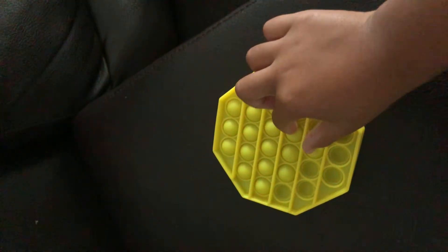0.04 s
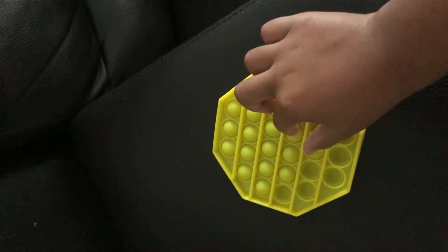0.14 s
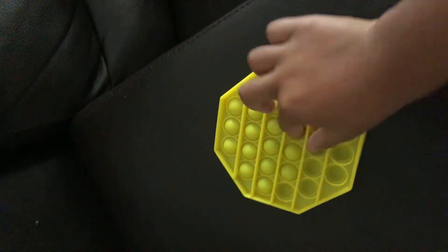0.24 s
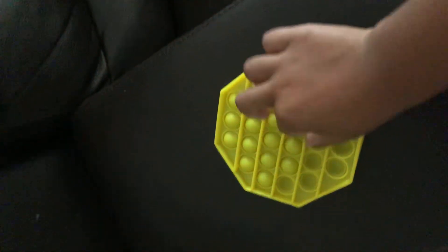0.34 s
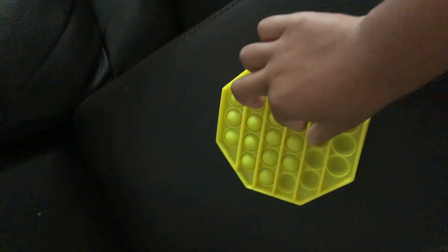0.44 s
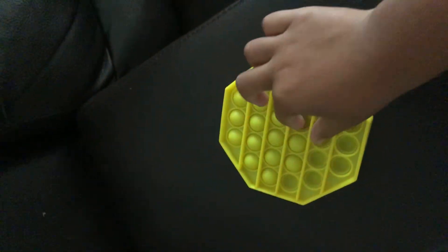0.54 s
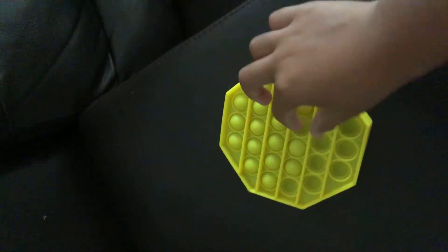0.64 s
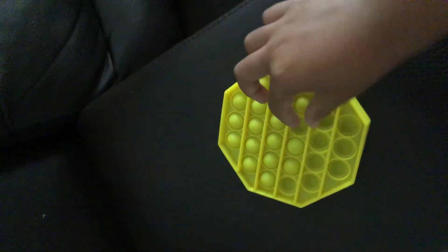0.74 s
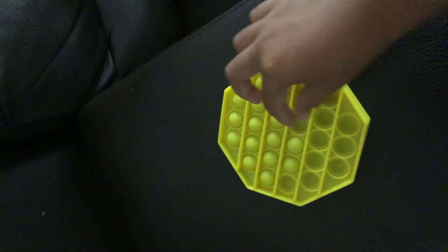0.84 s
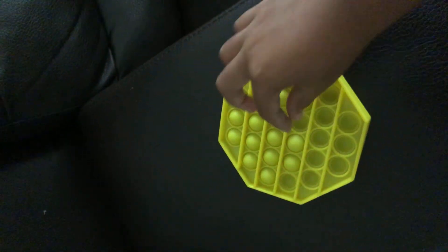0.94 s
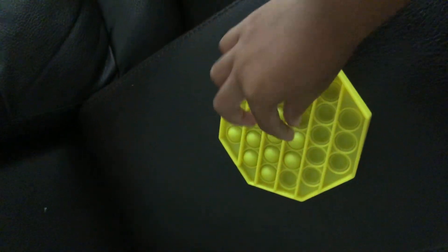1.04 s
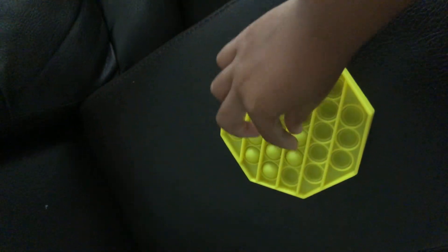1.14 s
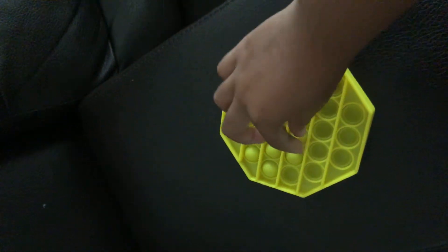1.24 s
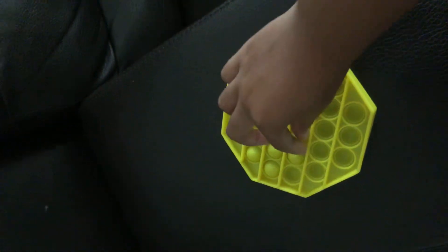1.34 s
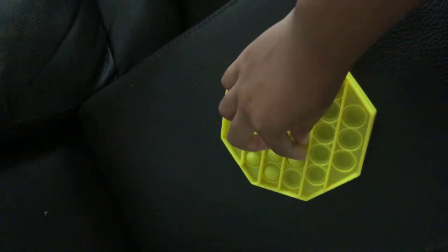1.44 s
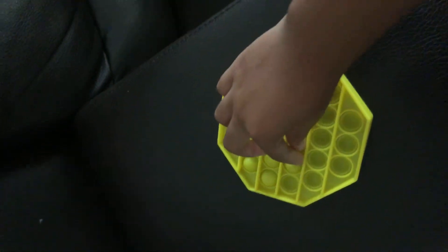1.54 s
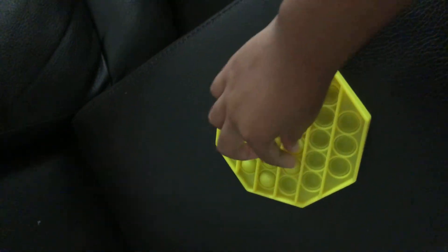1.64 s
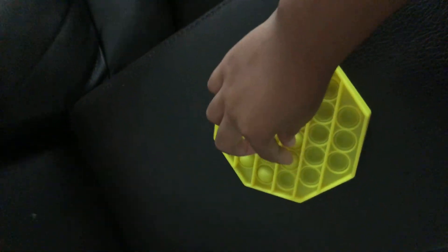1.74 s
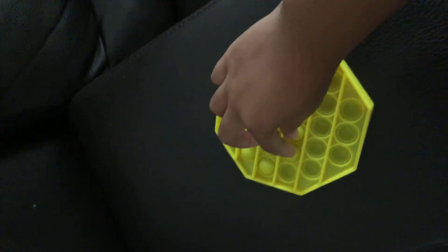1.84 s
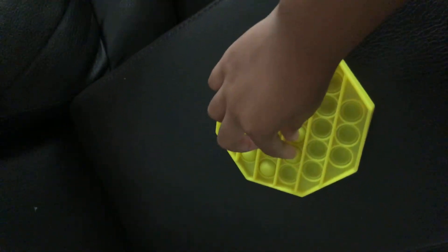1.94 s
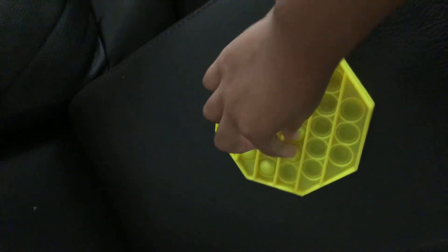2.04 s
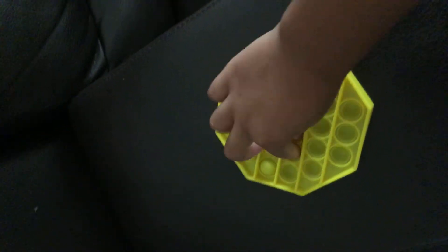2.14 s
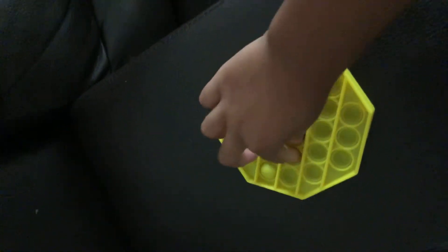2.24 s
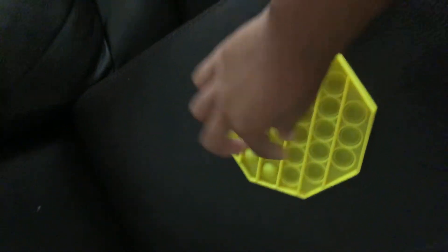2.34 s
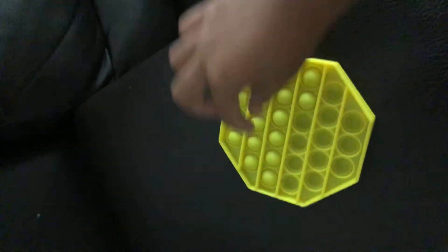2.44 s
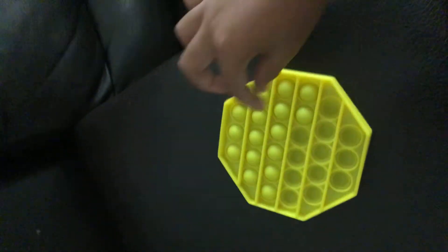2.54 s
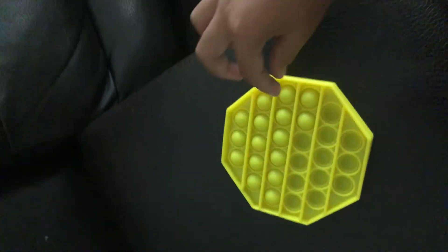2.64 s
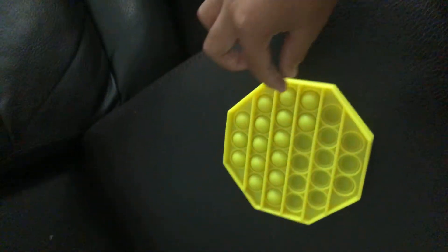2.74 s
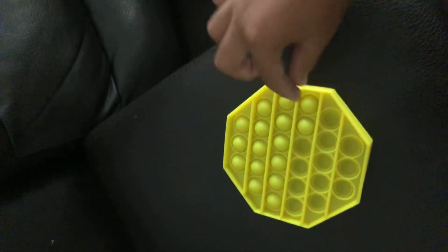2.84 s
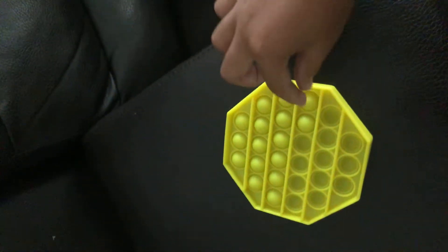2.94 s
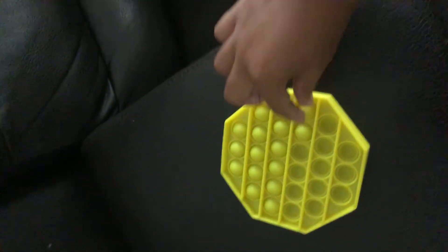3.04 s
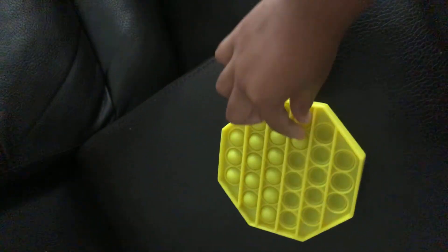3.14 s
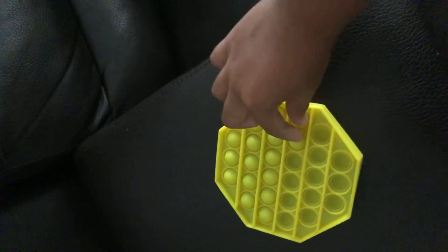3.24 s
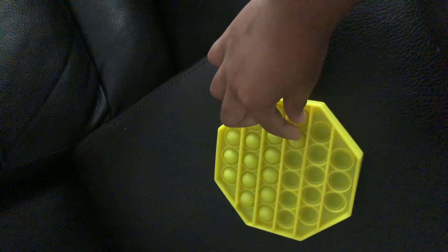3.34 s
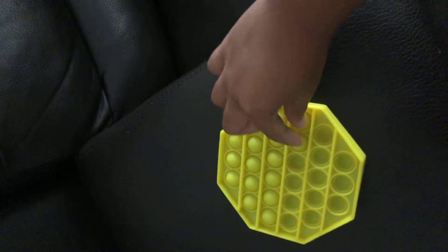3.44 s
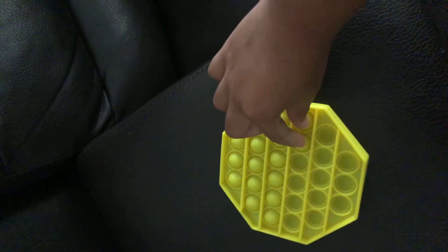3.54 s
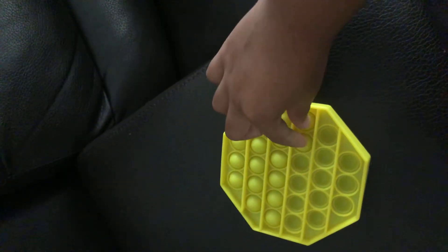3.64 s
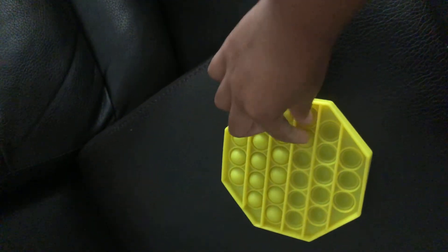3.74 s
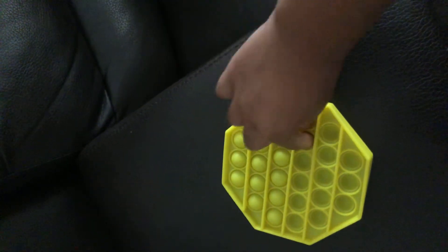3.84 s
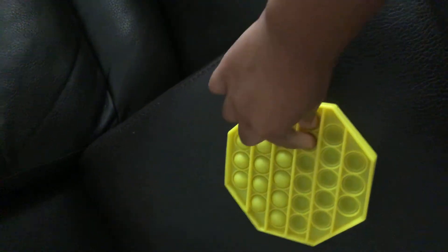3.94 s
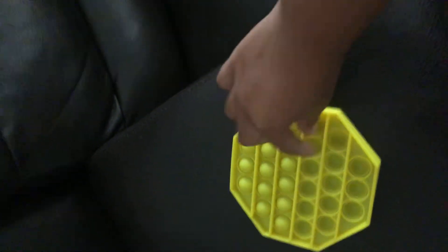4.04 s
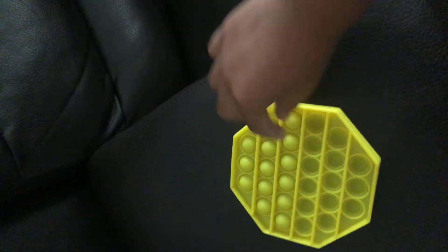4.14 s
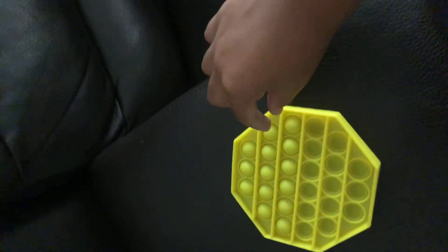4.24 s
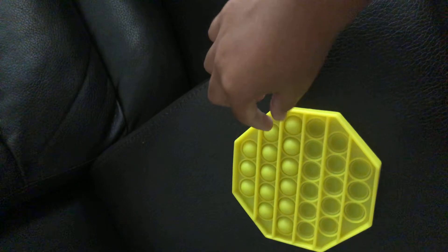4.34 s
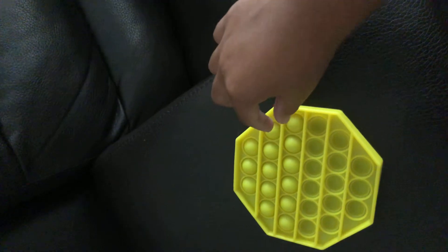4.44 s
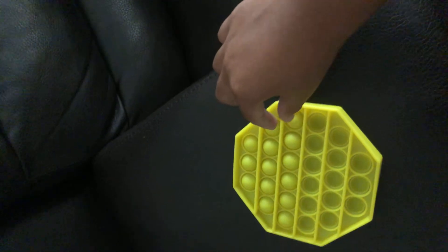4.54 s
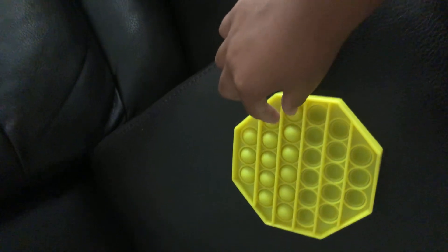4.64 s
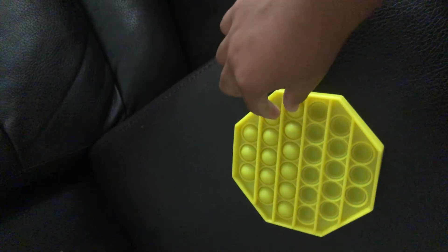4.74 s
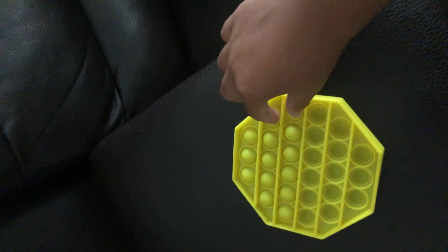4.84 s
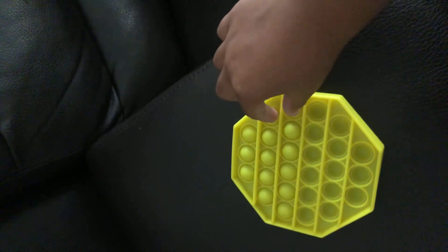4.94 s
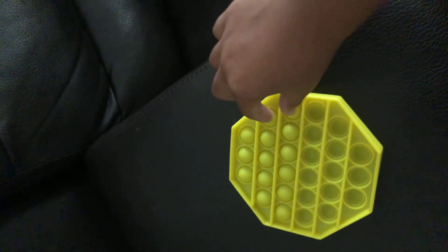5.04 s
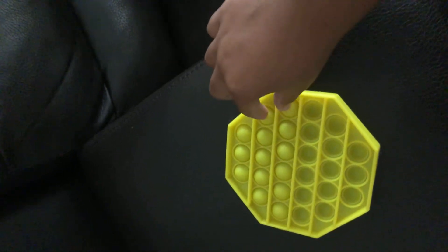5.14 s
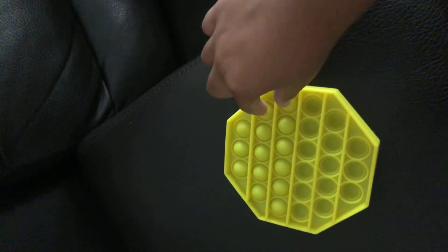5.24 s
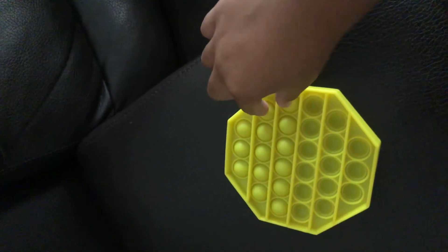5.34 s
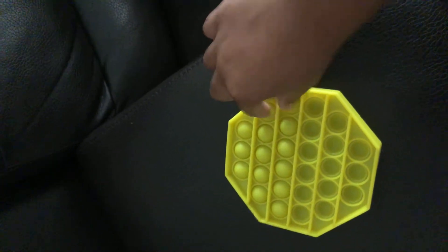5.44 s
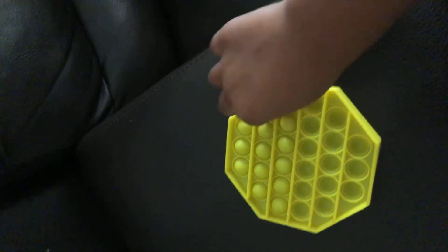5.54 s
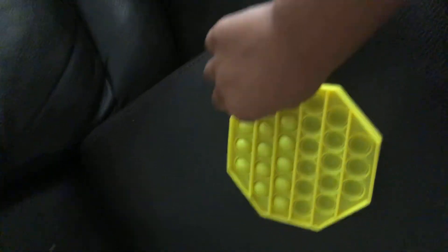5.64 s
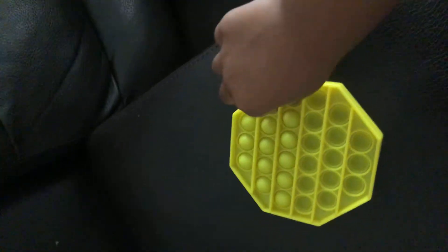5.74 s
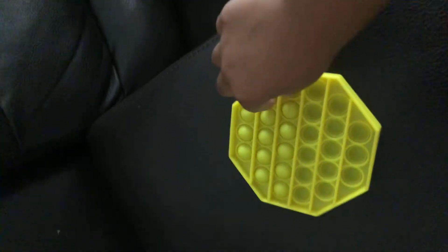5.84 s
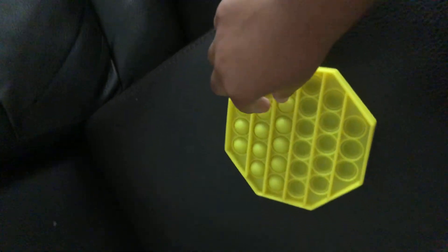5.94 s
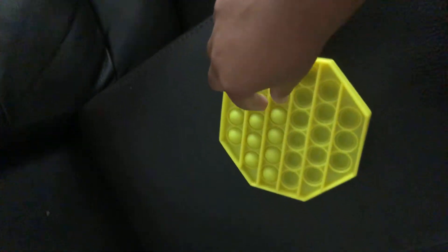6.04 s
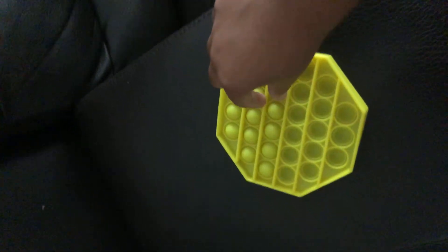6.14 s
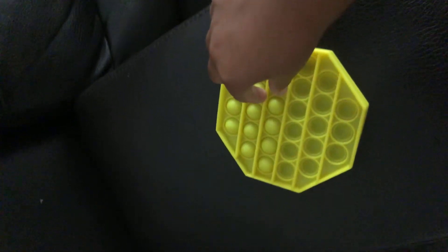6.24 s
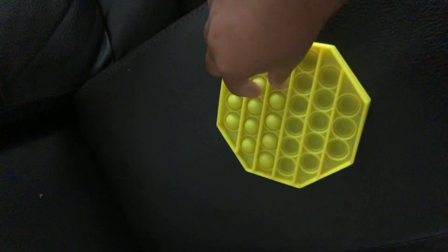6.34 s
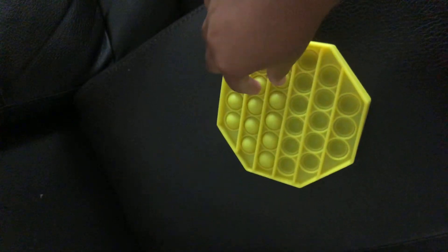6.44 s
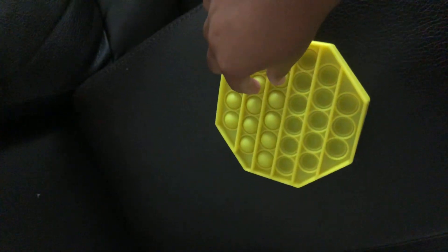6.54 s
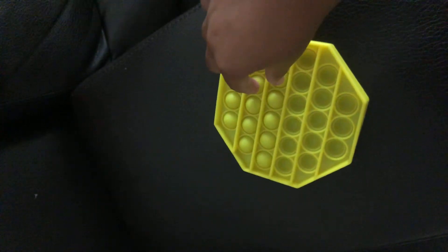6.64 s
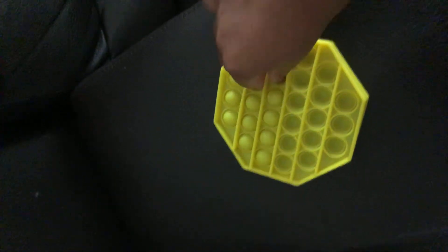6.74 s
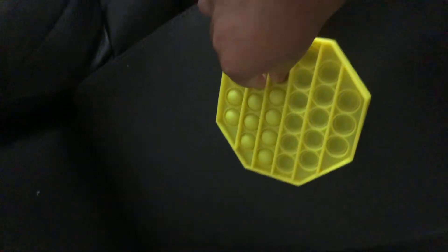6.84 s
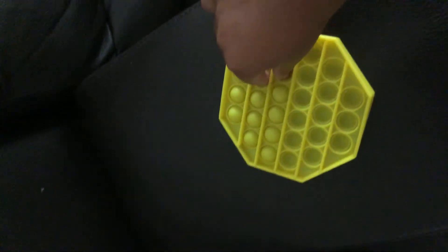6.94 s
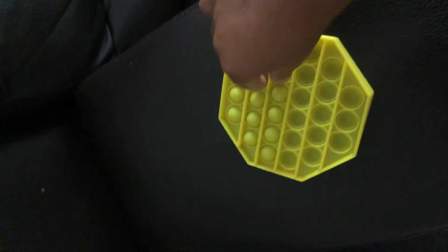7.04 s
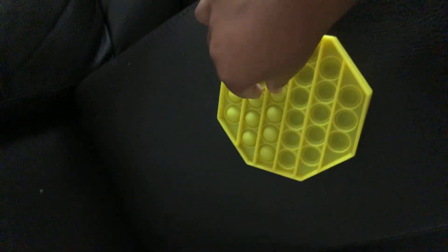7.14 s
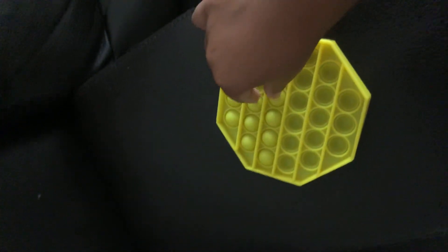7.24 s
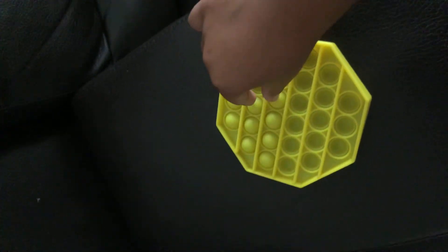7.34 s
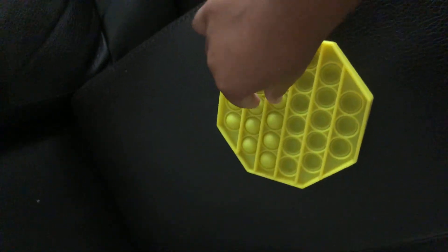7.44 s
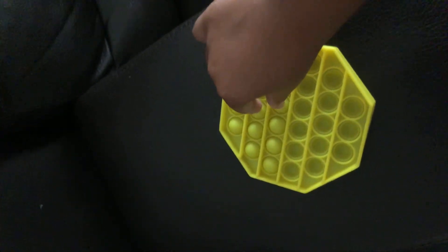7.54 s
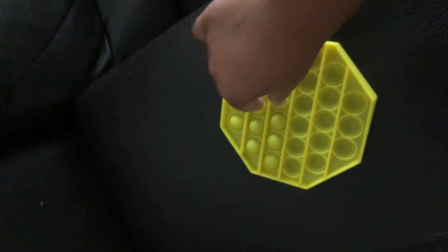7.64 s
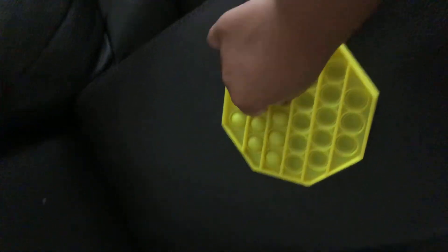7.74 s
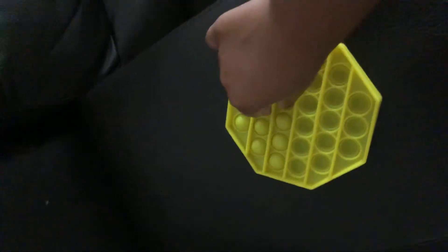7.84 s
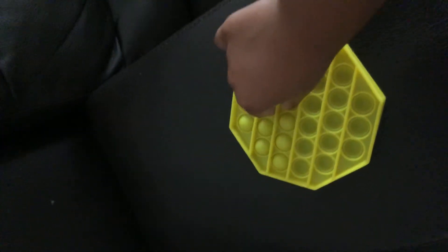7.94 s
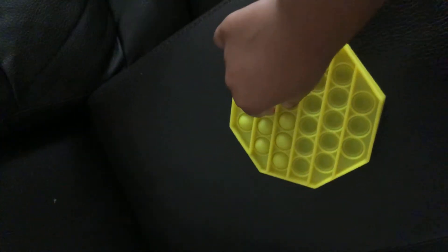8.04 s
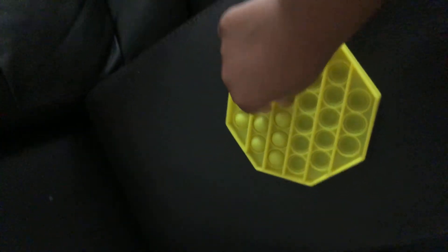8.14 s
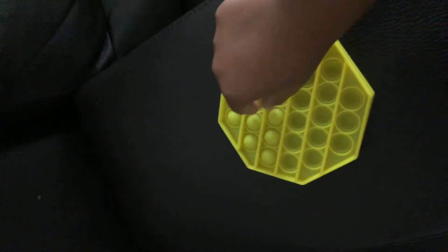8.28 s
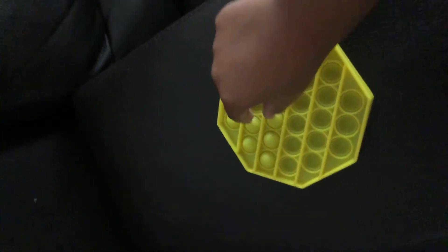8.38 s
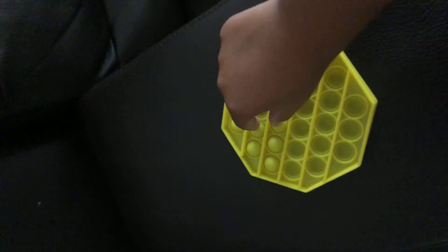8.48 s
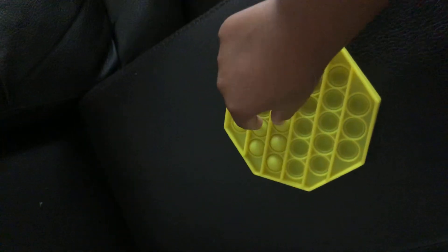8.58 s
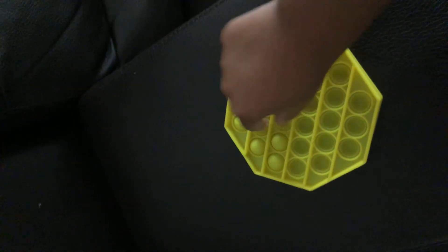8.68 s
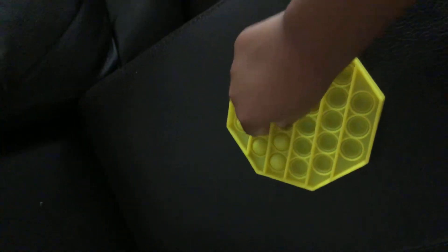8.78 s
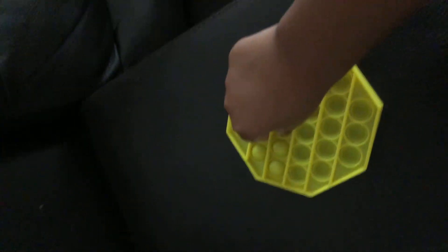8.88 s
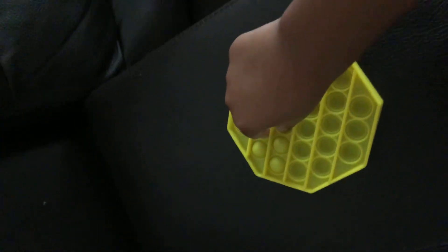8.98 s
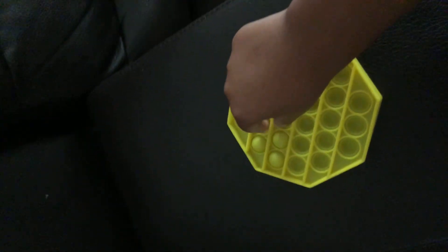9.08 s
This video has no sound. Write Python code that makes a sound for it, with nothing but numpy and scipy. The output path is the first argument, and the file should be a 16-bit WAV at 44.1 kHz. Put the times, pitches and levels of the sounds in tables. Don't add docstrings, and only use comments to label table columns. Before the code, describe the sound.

Seven sharp, hollow silicone pops, spaced one to two seconds apart, in a quiet living room over faint low hum and soft hiss.

```python
import sys
import numpy as np
from scipy import signal
from scipy.fft import rfft, irfft, next_fast_len
from scipy.io import wavfile
from scipy.ndimage import uniform_filter1d

SR = 44100
rng = np.random.default_rng(int(sys.argv[2]) if len(sys.argv) > 2 else 0)


def nominal_scale(level):
    x = np.asarray(level, float) / 20
    return 10 ** x


def wav_record(signal):
    frames = np.transpose(np.atleast_2d(signal))
    bounded = np.clip(frames, -1, 1)
    quanta = np.round(bounded * 32767).astype(np.int16)
    wavfile.write(sys.argv[1], SR, quanta)


N = 401751
LENGTH = next_fast_len(N, real=True)
RISE_S, GRIP = 0.0018, 1.9


def shaped(gain):
    noise = irfft(rfft(rng.standard_normal(LENGTH)) * gain, LENGTH)
    return noise / noise.std()


def colour(points, hz):
    f, db = np.transpose(points)
    return nominal_scale(np.interp(np.log(hz + 1), np.log(f), db))


def bell(hz, centre_hz, width_hz):
    return 1 / (1 + ((hz - centre_hz) / (width_hz / 2)) ** 2)


def ring(hz, db, t60, rise, phase=0., grip=1.):
    t = np.arange(int(1.2 * t60 * SR)) / SR
    build_up = 1 - np.exp(-(t / rise) ** 2)
    decay = np.exp(-np.log(1000) * (t / t60) ** grip)
    shape = build_up * decay
    return nominal_scale(db) * shape / shape.max() * np.sin(2 * np.pi * hz * t + phase)


def add(out, s, x):
    i = max(int(s * SR), 0)
    out[i:i + len(x)] += x[:len(out) - i]


def detune(spread):
    return 1 + spread * rng.standard_normal()


# start in seconds, low boom in dB, seat thud in dB, rim ring in dB,
# air puff in dB.
POPS = [
    (0.177, -49, -35, -53, -29.5),
    (2.018, -42, -33.5, -38.5, -29),
    (3.71, -45, -33.5, -23, -29.5),
    (5.408, -44, -45, -28, -30),
    (6.633, -38, -28, -31, -27.5),
    (7.619, -50.5, -73, -35, -30.5),
    (8.635, -49, -53, -40.5, -30.5),
]
# centre in seconds, spread in seconds, mid hiss in dB,
# treble hiss in dB.
ARM_SHIFTS = [
    (.45, 0.12, -2.5, 2),
    (1.05, 0.24, 3.5, 1.2),
    (2.62, 0.15, .7, 2.5),
    (3.6, .15, 0.6, 3),
    (3.921, .1, 5.5, -1.5),
    (4.48, 0.21, 3.5, 2.5),
    (5.35, .2, 0.2, 2.5),
    (6.15, 0.21, -0.3, 1),
    (7.5, .3, 4.5, 0.5),
    (8.0, 0.093, 3, 2.5),
]


def suppressor(t):
    duck = 0
    for s, *_ in POPS:
        late = t - s - 0.3
        duck = duck + np.exp(-(late / np.where(late > 0, 0.2, 0.08)) ** 2)
    mid_db, treble_db = 0, 0
    for s, spread_s, shift_mid_db, shift_treble_db in ARM_SHIFTS:
        opening = np.exp(-((t - s) / spread_s) ** 2)
        mid_db = mid_db + shift_mid_db * opening
        treble_db = treble_db + shift_treble_db * opening
    top_db = 0.48 * treble_db
    return mid_db - 1.5 * duck, treble_db - 2.5 * duck, top_db


# frequency in Hz, density in dB per Hz.
HISS_COLOUR = [(25, -34), (40, -10), (60, -12), (90, -13), (170, -11), (250, -13.5), (530, -17),
               (1200, -25.5), (2000, -30.5), (4000, -32), (5700, -32), (7800, -35), (8400, -37),
               (16000, -41)]


def room_hiss(t, hz):
    mid_db, treble_db, top_db = suppressor(t)
    gain = colour(HISS_COLOUR, hz)
    share = np.sum(gain[(hz > 2000) & (hz < 7000)] ** 2) / np.sum(gain ** 2)
    hiss = rfft(shaped(gain)) * nominal_scale(-78) / np.sqrt(share)
    crossover = 1 / (1 + (hz / 1600) ** 4)
    mid = crossover * (hz > 190)
    treble = (1 - mid) * (hz > 190) * (hz < 8000)
    top = (1 - mid) * (hz >= 8000)
    out = irfft(hiss * (hz <= 190), LENGTH)
    out += irfft(hiss * mid, LENGTH) * nominal_scale(mid_db + 0.33)
    out += irfft(hiss * treble, LENGTH) * nominal_scale(treble_db + 0.42)
    out += irfft(hiss * top, LENGTH) * nominal_scale(top_db - 0.3)
    return out


# pitch in Hz, steady part in dB, wavering part in dB, width of the waver in Hz.
HUM = [(60.5, -74.5, -79, 13), (119.6, -66, -72.5, 25), (169.4, -77.5, -78, 15)]


def mains_hum(hz):
    out = np.zeros(LENGTH)
    for f, steady_db, waver_db, width_hz in HUM:
        pitch = 1 + 0.02 * shaped(bell(hz, 0, 6))
        out += nominal_scale(steady_db) * np.sqrt(2) * np.sin(2 * np.pi * f * np.cumsum(pitch) / SR)
        out += nominal_scale(waver_db) * shaped(bell(hz, f, width_hz))
    return out


# flip in seconds, pitch in Hz, level in dB.
LEAD_TONES = [(.175, 2200, -37.5), (.173, 3200, -42.5), (2.0165, 2200, -41), (2.012, 3100, -47),
              (3.710, 3300, -42.5), (5.408, 3000, -39), (6.6325, 2100, -37), (7.6185, 2200, -40.5),
              (8.6345, 3100, -37)]


def lead_tones():
    out = np.zeros(LENGTH)
    for s, hz, db in LEAD_TONES:
        tone = ring(hz, db + 1.0, 0.018, 0.00051)[::-1]
        add(out, s + 0.0011 - len(tone) / SR, tone)
    return out


def lead_in(x):
    n = int(0.014 * SR)
    swell = rng.standard_normal(n) * np.linspace(0.3, 1, n) * nominal_scale(-23.5) / np.sqrt(n)
    return signal.fftconvolve(x, swell)[n - 1:]


# start in seconds, lowest mode in dB, lowest mode in Hz,
# second mode in relative dB, upper modes in relative dB.
SNAPS = [(0.175, -25.5, 722, 1, 4), (0.184, -24.5, 670, -5.5, -1.5), (2.016, -23.5, 585, 3.5, -2.5),
         (2.025, -34, 477, 0.5, -13.5), (2.032, -24, 753, -14.5, -16), (3.71, -23, 630, 2, 4.5),
         (3.719, -31.5, 510, -0.5, -5.5), (5.408, -17, 648, 0, -11), (5.419, -36.5, 590, 6, -5.5),
         (6.632, -22.5, 698, -1, -0.5), (6.638, -25, 630, 8, 0), (6.647, -40.5, 615, -12.5, 10.5),
         (7.618, -24.5, 576, 1.5, -1), (7.627, -37, 512, -8, -5), (7.631, -27.5, 670, -13, -8.5),
         (8.635, -17, 647, 0, -3), (8.644, -38.5, 583, -4, -9)]
# frequency in Hz, t60 in seconds.
SECOND = (1391, 0.0098)
# frequency in Hz, level in dB, t60 in seconds.
UPPER = [(2010, -3, .011), (2490, -9, 0.0084)]
# frequency in Hz, level in dB, t60 in seconds.
CRACK = [(3960, 2.5, 0.0051), (5230, -1, 0.0088), (5970, 0.5, 0.0047)]
# cap mode in Hz, cap mode in dB,
# bright mode in Hz, bright mode in dB, crack in dB.
UPWARDS = [(2970, -27.5, 4290, -37.5, -30.5), (2940, -26.5, 4300, -30, -25), (3000, -29, 4200, -42.5, -45),
           (2780, -29.5, 5900, -40.5, -32.5), (2710, -26, 5900, -41, -35.5),
           (2606, -27.5, 5680, -39.5, -38), (2686, -24, 4930, -40, -27.5)]
REBOUND_CRACKS = [-35, -42.5, -35.5, -43, -53, -32, -43.5, -41, -53, -33.5]
# frequency in Hz, level over the crack in dB, t60 in seconds.
TICK = (8400, -27, .003)


def snaps():
    out = np.zeros(LENGTH)
    rebound_cracks = iter(REBOUND_CRACKS)
    for s, db, hz, second_db, upper_db in SNAPS:
        since = s - np.array(POPS)[:, 0]
        pop = np.argmin(abs(since))
        is_rebound = since[pop] >= 0.004
        crack_db = next(rebound_cracks) if is_rebound else UPWARDS[pop][4]
        if is_rebound:
            cap_hz = UPWARDS[pop][0] * detune(0.03)
            add(out, s, ring(TICK[0] * detune(0.03), crack_db + TICK[1] + 11, TICK[2], RISE_S / 2))
            add(out, s, ring(cap_hz, crack_db - 5.5, 0.011, RISE_S / 2, 0., GRIP))
        add(out, s + 0.00065, ring(hz, db, 0.014, 0.0021, np.pi, GRIP))
        add(out, s, ring(SECOND[0] * detune(0.031), db + second_db, SECOND[1], RISE_S, 0., GRIP))
        for k, (f, d, t60) in enumerate(UPPER):
            add(out, s, ring(f * detune(0.018), db + upper_db + d, t60, RISE_S / 2, np.pi * k, GRIP))
        for k, (f, d, t60) in enumerate(CRACK):
            add(out, s, ring(f * detune(0.035), crack_db + d - 12.5, t60, RISE_S / 2, np.pi * k, GRIP))
    return out


RIMS_HZ = [885, 830, 880, 954, 996, 1010, 1045]
THUDS_HZ = [300, 260, 395, 300, 374, 270, 290]


def thuds_and_rims():
    out = np.zeros(LENGTH)
    for (s, _, thud_db, rim_db, _), rim_hz, thud_hz in zip(POPS, RIMS_HZ, THUDS_HZ):
        add(out, s, ring(thud_hz, thud_db, 0.021, RISE_S, 0., GRIP))
        add(out, s, ring(rim_hz, rim_db - 0.5, 0.012, RISE_S, 0., GRIP))
    return out


def modes(per_pop, t60):
    out, times = np.zeros(LENGTH), np.array(SNAPS)[:, 0]
    rise = min(RISE_S * 0.8, t60 / 4)
    for (s, *_), pairs in zip(POPS, per_pop):
        flip_s = times[times > s - 0.004][0]
        for hz, db in pairs:
            add(out, flip_s + 0.0002, ring(hz, db, t60, rise, 0., GRIP))
    return out


def upward_modes():
    return modes([(row[0:2], row[2:4]) for row in UPWARDS], 0.0075)


# frequency in Hz, density in dB per Hz.
PUFF_COLOUR = [(100, -6), (250, -2.5), (500, 0), (1000, -5), (2500, -12), (3800, -19), (6300, -25.5),
               (7500, -36.5), (11000, -46), (16000, -56)]


def puffs(hz):
    gate, pulse, t = np.zeros(LENGTH), np.zeros(LENGTH), np.arange(SR // 20) / SR
    peak_s = 0.001751
    for s, *_, puff_db in POPS:
        add(gate, s, nominal_scale(puff_db) * t / peak_s * np.exp(1 - (t / peak_s) ** 2))
        pulse[int((s + peak_s) * SR)] = nominal_scale(puff_db + 19.5)
    both = np.array([gate * rng.standard_normal(LENGTH), pulse * nominal_scale(7.5)])
    return irfft(rfft(both) * colour(PUFF_COLOUR, hz), LENGTH) * nominal_scale(14.0)


# ring share in dB, low mode in Hz, low mode in dB,
# favoured mode in Hz, favoured mode in dB.
SIDEWAYS = [(-11, 640, -32, 2050, -32), (-5, 530, -27.5, 820, -25), (-6.5, 900, -26, 1990, -29.5),
            (-2, 500, -24, 2240, -29.5), (-2, 1560, -26, 1950, -27), (-9, 545, -34, 2000, -49),
            (-2.5, 586, -26, 2026, -29)]
# frequency in Hz, level in dB.
SKIRTS = [(4400, -40), (4800, -31), (2300, -42.5), (3540, -35), (3160, -29), (5400, -44), (4930, -35)]
# start in seconds, frequency in Hz, level in dB.
LATE_TICKS = [
    (6.755, 1520, -42),
    (6.76, 2000, -41),
]


def sideways_modes():
    out = modes([(row[1:3], row[3:5]) for row in SIDEWAYS], 0.0065)
    out += modes([[row] for row in SKIRTS], 0.0016) * nominal_scale(3.5)
    for s, f, db in LATE_TICKS:
        add(out, s, ring(f, db, 0.0067, RISE_S))
    return out


# centre in Hz, t60 in seconds, level in dB.
ROOM = [(90, .5, -4.5), (183, 0.33, -4), (353, 0.36, 3.5), (670, 0.43, 3.5), (1385, 0.48, 1.5),
        (2800, 0.48, 3.5), (5900, 0.38, 1), (11000, 0.27, 4)]


def room(x):
    t = np.arange(SR) / SR
    hz, tail = np.fft.rfftfreq(SR, 1 / SR), 0
    for f, t60, db in ROOM:
        octave = np.cos(np.pi / 2 * np.clip(np.log2((hz + 1) / f), -1, 1)) ** 2
        band = irfft(rfft(rng.standard_normal(SR)) * octave, SR)
        tail = tail + nominal_scale(db) * band * np.exp(-np.log(1000) * t / t60) / np.sqrt(t60)
    first_paths = np.clip(t / 0.004, 0, 1) ** 2
    tail *= first_paths * nominal_scale(-5.5) * np.sqrt(2 * np.log(1000) / SR)
    return signal.fftconvolve(x, tail)[:LENGTH]


# frequency in Hz, level in dB, t60 in seconds.
BOOM = [(62, -6.5, 0.1), (131.5, -2.5, .35), (213.5, -8.5, 0.33)]


def booms():
    out = np.zeros(LENGTH)
    for s, boom_db, *_ in POPS:
        for f, d, t60 in BOOM:
            add(out, s, ring(f, boom_db + d, t60, 0.0093))
    return out


def stroke(t, s, rise, hold, db, fade_db_s):
    fade_db = fade_db_s * np.maximum(t - s - rise - hold, 0)
    return nominal_scale(db - fade_db) * np.clip((t - s) / rise, 0, 1) ** 2


# start in seconds, build-up in seconds, hold in seconds,
# seat ring in dB, rustle in dB.
DRAGS = [
    (1.284, 0.02, .11, -57.5, -75.5),
    (1.507, 0.074, 0.06, -65, -62),
]
# frequency in Hz, density in dB per Hz.
RUB_COLOUR = [(120, -9.5), (200, 2.5), (350, -3), (550, -2), (800, -11.5), (1200, -9), (2500, -18.5),
              (5000, -25), (8000, -34), (11000, -48.5)]


def drags(t, hz):
    roughness = uniform_filter1d(rng.standard_normal(LENGTH), size=220) * np.sqrt(220)
    grain = nominal_scale(1.5 * roughness)
    seat = shaped(bell(hz, 450, 130))
    leather = shaped(colour(RUB_COLOUR, hz))
    skin = irfft(rfft(leather) * bell(hz, 3300, 2800), LENGTH)
    out = np.zeros(LENGTH)
    for (s, rise, hold, seat_db, rustle_db), skin_db in zip(DRAGS, (8.5, -7.5)):
        out += seat * stroke(t, s, rise, hold, seat_db, 145)
        rustle = skin * stroke(t, s, rise, hold, rustle_db + 5.0 + skin_db, 97)
        rustle += leather * stroke(t, s, rise, hold, rustle_db + 7.0, 97)
        out += grain * rustle
    return out


# start in seconds, level in dB, frequency in Hz.
TAPS = [
    (3.005, -49.5, 480),
    (7.345, -68, 200),
    (7.382, -73, 299),
    (7.536, -54, 170),
]
# start in seconds,
# level in dB, frequency in Hz, t60 in seconds.
THUMPS = [
    (3.792, -46.5, 137.5, 0.24),
    (3.8, -43.5, 192, .05),
    (7.497, -55.5, 250, 0.089),
    (7.56, -57, 270, 0.067),
]


def taps_and_thumps():
    out = np.zeros(LENGTH)
    for s, db, f in TAPS:
        add(out, s, ring(f, db, 0.015, 0.0028))
    for s, db, f, t60 in THUMPS:
        add(out, s, ring(f, db, t60, 0.013))
    return out


def scene():
    t, hz = np.arange(LENGTH) / SR, np.fft.rfftfreq(LENGTH, 1 / SR)
    background = room_hiss(t, hz) + mains_hum(hz)
    rings = snaps() + thuds_and_rims()
    air, pulse = puffs(hz)
    pops = rings + air + upward_modes()
    share_db = np.interp(t, np.array(POPS)[:, 0], np.array(SIDEWAYS)[:, 0])
    to_walls = rings * nominal_scale(share_db - 8.5) + pulse + sideways_modes() * nominal_scale(3.5)
    pops_in_room = lead_tones() + lead_in(pops) + pops + room(to_walls) + booms()
    hand = drags(t, hz) + taps_and_thumps()
    return (background + pops_in_room + hand)[None, :N]


def top_cut(x):
    return signal.sosfilt(signal.butter(12, 16340, fs=SR, output="sos"), x)


def record(dry):
    bass_cut = signal.butter(3, 44, "high", fs=SR, output="sos")
    mix = signal.sosfilt(bass_cut, dry)
    return top_cut(mix)


dry = scene()
out = record(dry)
wav_record(out)
```